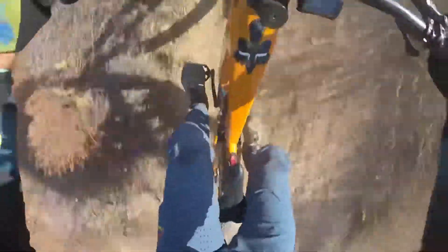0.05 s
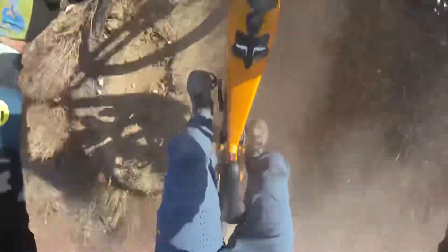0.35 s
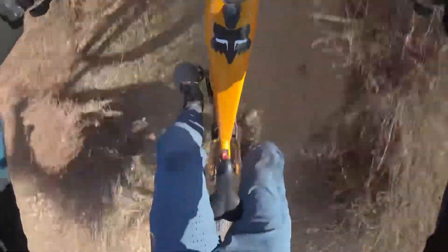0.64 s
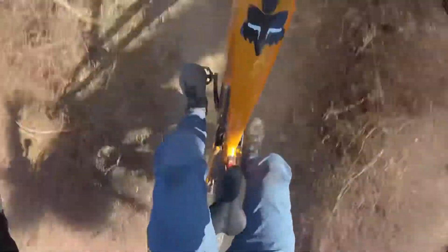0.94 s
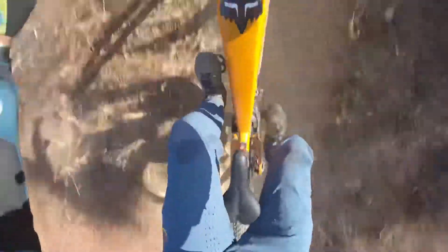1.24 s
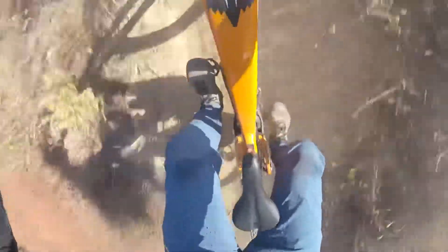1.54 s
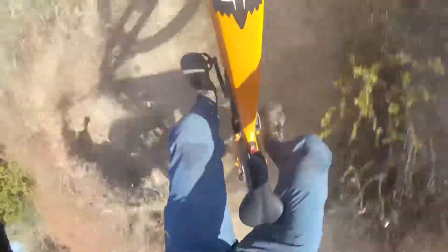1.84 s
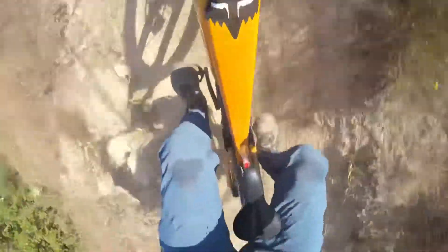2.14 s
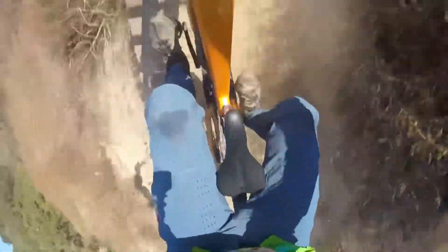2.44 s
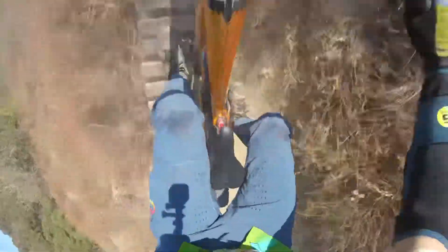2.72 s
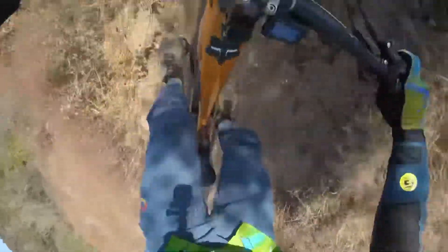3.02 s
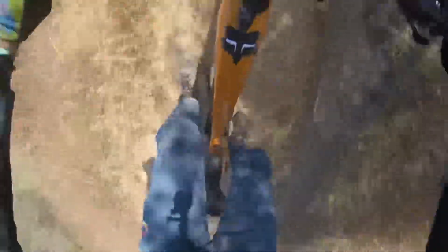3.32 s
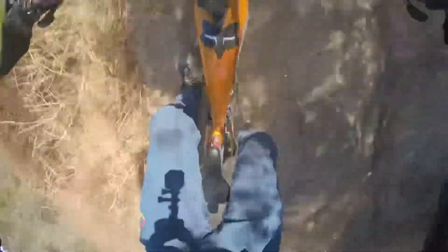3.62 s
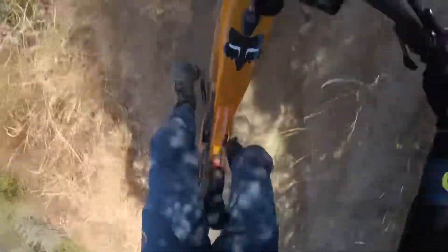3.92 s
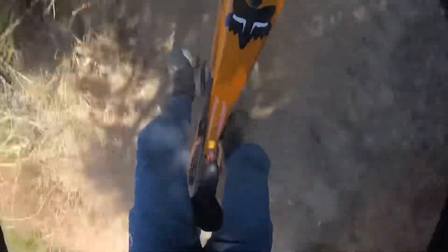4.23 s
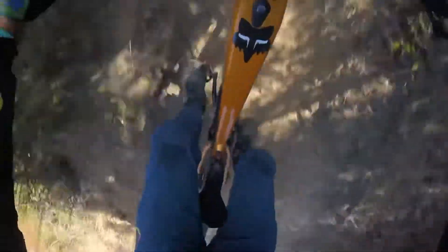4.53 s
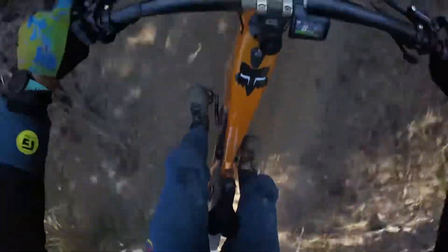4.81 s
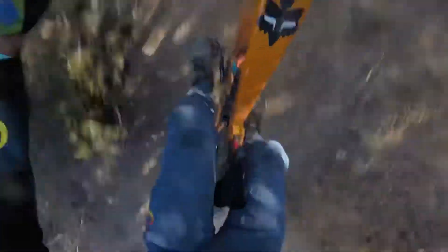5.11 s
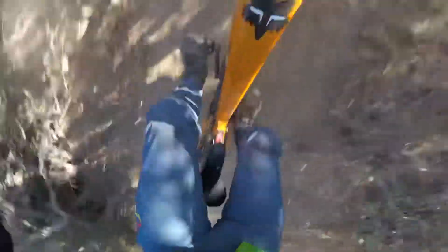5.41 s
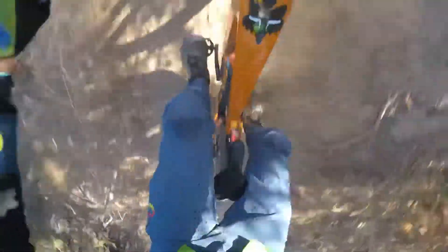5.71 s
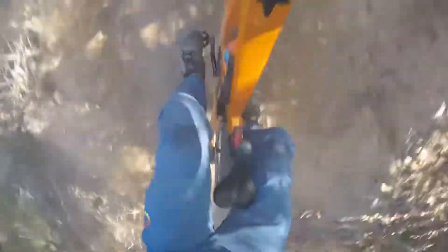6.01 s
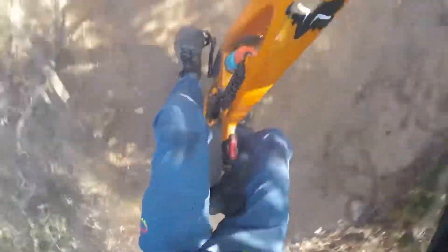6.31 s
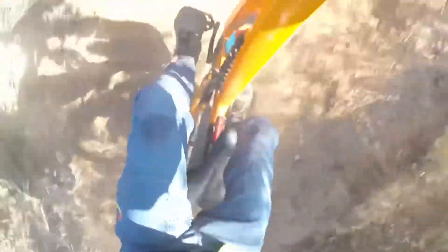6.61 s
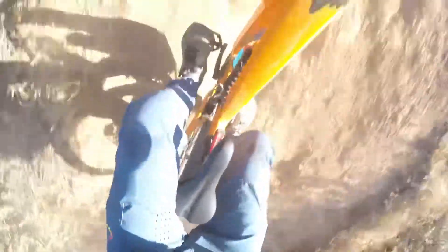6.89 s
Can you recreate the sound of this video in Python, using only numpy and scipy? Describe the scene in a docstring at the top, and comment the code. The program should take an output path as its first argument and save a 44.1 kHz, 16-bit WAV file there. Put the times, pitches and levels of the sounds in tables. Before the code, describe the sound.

A mountain bike's tyres crunch and chain rattles under thumping wind, which eases abruptly after one loud knock on the microphone.

```python
"""Mountain bike on a dry dirt trail

Heard from a camera worn by the rider. Wind buffets the microphone and hisses at its port, jolts thump it.
The tyres crunch over grit, chain and cables rattle on the frame, grass brushes past and twigs snap.
Among the bushes something knocks the camera and the rush drops at once; then the tyres dig into loose dirt.
"""
import sys
import numpy as np
from scipy import signal
from scipy.fft import rfft, irfft
from scipy.io import wavfile
from scipy.ndimage import uniform_filter1d

SR = 44100
rng = np.random.default_rng(int(sys.argv[2]) if len(sys.argv) > 2 else 0)


def dump_mix(stems):
    """Bounce the given channels to the path in sys.argv[1] as a 16-bit WAV at rate SR."""
    frames = np.atleast_2d(stems).T  # one column per channel
    limited = np.clip(frames, -1, 1)  # hard clip at full scale
    pcm = np.round(limited * 32767).astype(np.int16)
    wavfile.write(sys.argv[1], SR, pcm)


N = 315315
TIME = np.arange(N) / SR

# Jolts that thump the microphone. Each row: time in seconds, relative peak in dB, push width in seconds.
JOLTS = [(0.249, 0.5, 0.0058), (0.372, -1.5, 0.0043), (0.522, -5.5, 0.0035), (0.587, -19, 0.0038),
         (0.684, -11.5, 0.0022), (0.785, -14, 0.0061), (0.871, -11, 0.0048), (0.918, -8.5, 0.0024),
         (0.979, -11, 0.0062), (1.031, -10.5, 0.0063), (1.486, -20, 0.007), (1.572, -8.5, 0.0021),
         (1.685, -10, 0.0026), (1.807, -8.5, 0.0041), (1.866, -8.5, 0.0037), (1.929, -3, 0.0058),
         (1.987, -17, 0.008), (2.091, -12, 0.0037), (2.168, -8, 0.0036), (2.362, -11, 0.0022),
         (2.53, -10.5, 0.0027), (2.597, -20, 0.0055), (2.67, -16, 0.0015), (2.774, -18.5, 0.0055),
         (2.906, -17.5, 0.0023), (3.048, -9.5, 0.0046), (3.09, -15, 0.0033), (3.201, -5, 0.0056),
         (3.294, -11.5, 0.0062), (3.373, -6.5, 0.0058), (3.425, -16.5, 0.0028), (3.506, -10, 0.0054),
         (3.639, -21, 0.005), (3.709, -20, 0.0038), (3.892, -21, 0.008), (4.012, -12.5, 0.0045),
         (4.099, -20.5, 0.0064), (4.156, -14, 0.008), (4.341, -6.5, 0.0053), (4.394, -10.5, 0.0026),
         (4.563, -8, 0.0047), (4.707, -9, 0.0038), (4.767, -12.5, 0.0019), (4.93, -14, 0.0036),
         (5.065, -15.5, 0.0045), (5.443, -20, 0.0035), (5.554, -22.5, 0.003), (5.671, -28.5, 0.0061),
         (5.74, -32, 0.008), (5.812, -34, 0.0074), (6.152, -23, 0.0026), (6.25, -26, 0.0077),
         (6.355, -24, 0.007), (6.4, -22.5, 0.0077), (6.593, -15.5, 0.0055), (6.868, -20, 0.008),
         (6.95, -16, 0.0059), (7.134, -13.5, 0.0031)]
# Hollow resonances of the frame. Each row: pitch in Hz, width in Hz, lift in dB.
FRAME_MODES = [(833, 81, 0.5), (1200, 120, 3), (1650, 200, -3), (2160, 210, 1.5)]


def gain_of(db):
    """Decibels to amplitude."""
    return np.exp(np.asarray(db) * float(np.log(10) / 20))


def unit_rms(x):
    """Scales to rms 1."""
    return x / np.sqrt(np.mean(x ** 2) + 1e-20)


def add(mix, start, sound):
    """Mixes a sound in at a time in seconds."""
    part = mix[max(round(start * SR), 0):][:len(sound)]
    part += sound[:len(part)]


def colour(x, spectrum):
    """A causal EQ of unit energy, drawn through points of frequency in Hz and level in dB."""
    size = 8192
    point_hz, db = np.transpose(spectrum)
    hz = abs(np.fft.fftfreq(size, 1 / SR))
    log_gain = np.log(gain_of(np.interp(np.log(hz + 1), np.log(point_hz), db)))
    taps = np.fft.ifft(np.exp(np.conj(signal.hilbert(log_gain)))).real[:size // 2]  # minimum phase
    return signal.oaconvolve(x, taps / np.linalg.norm(taps))[:N]


def lift(x, modes):
    """Adds the ring of a few resonances to a sound."""
    for hz, width, db in modes:
        x = x + (gain_of(db) - 1) * signal.lfilter(*signal.iirpeak(hz, hz / width, fs=SR), x)
    return x


def resonate(x, hz, width_hz):
    """A resonance of gain 1 that follows a pitch curve."""
    turn = np.exp(2j * np.pi * np.cumsum(hz) / SR)
    pole = np.exp(-np.pi * width_hz / SR)
    return 2 * (turn * signal.lfilter([1 - pole], [1, -pole], x / turn)).real


def low_cut(x, hz, q):
    """A resonant high-pass: a push of pressure swings back and rings."""
    w = 2 * np.pi * hz
    return signal.lfilter(*signal.bilinear([1, 0, 0], [1, w / q, w * w], SR), x)


def wander(rate_hz):
    """A random drift of rms 1 that rolls off above the given rate."""
    hz = np.fft.rfftfreq(4096, TIME[-1] / 4096)
    drift = irfft(rfft(rng.standard_normal(4096)) * hz / (hz + 2) * np.exp(-(hz / rate_hz) ** 2))
    return np.interp(TIME, np.linspace(0, TIME[-1], len(drift)), unit_rms(drift))


def patchy(x, depth_db):
    """Lets narrow bands swell and fade on their own for some tens of ms."""
    bands = signal.stft(x.astype(np.float32), nperseg=512)[2]
    swell = uniform_filter1d(rng.random(bands.shape, np.float32) - .5, size=5, axis=0)
    swell = unit_rms(uniform_filter1d(swell, size=6, axis=1))
    return unit_rms(signal.istft(bands * gain_of(depth_db * swell), nperseg=512)[1][:N])


def arches(rows, power):
    """A gain that swells and fades once for each row; a low power flattens the top."""
    out = np.zeros(N)
    for start, length, db in rows:
        add(out, start, gain_of(db) * abs(np.sin(np.linspace(0, np.pi, round(length * SR)))) ** power)
    return out


def grit(per_s, spread_db):
    """Tiny impacts at random times: many small, a few large."""
    when, chance, sign = rng.random((40000, 3))[:round(per_s * TIME[-1])].T
    size = gain_of(spread_db * np.minimum(-np.log(1 - chance), 4))
    return unit_rms(np.bincount((when * N).astype(int), size * np.sign(sign - .5), N))


def burst(length, per_s, tail):
    """A fizzy cluster of impacts that starts abruptly, holds and dies; tail is a share of the length."""
    t = np.arange(round(3 * length * SR)) / SR
    envelope = np.minimum(t / (0.026 * length), 1) * np.exp(-np.maximum(t / length - .7, 0) / tail)
    fizz = rng.standard_normal(SR // 2)[:len(t)]
    struck = rng.random(SR // 2)[:len(t)] < per_s / SR
    hits = (.5 * fizz + np.sign(fizz) * struck * np.sqrt(SR / per_s)) * envelope
    return hits * np.sqrt(length * SR) / np.linalg.norm(hits)


def ride_gains():
    """Faders for air hiss and rolling tyres, which step down together among the bushes."""
    # Before and after the drop. Each row: time in seconds, relative hiss and grit levels in dB.
    open_trail = [(0.0, -43, -40), (0.37, -45, -42.5), (0.77, -42, -40), (1.8, -42.5, -41),
                  (2.28, -38.5, -42), (2.62, -41.5, -42), (2.79, -48, -49.5), (2.93, -48, -45.5),
                  (3.02, -45, -42.5), (3.2, -44, -41), (4.1, -44.5, -43.5), (4.29, -43, -40.5),
                  (4.9, -43, -44), (4.97, -41, -44)]
    bushes = [(5.1, -50.5, -49), (5.46, -53, -50.5), (5.85, -51.5, -47.5), (6.3, -48.5, -50.5),
              (6.6, -48, -45), (6.72, -47, -38), (7.15, -50.5, -40)]
    drop_s = 5.056
    before, after = np.transpose(open_trail), np.transpose(bushes)
    return [gain_of(np.where(TIME < drop_s, np.interp(TIME, before[0], a), np.interp(TIME, after[0], b)))
            for a, b in zip(before[1:], after[1:])]


def air_rush(hiss):
    """Smooth hiss of moving air, wavering a little."""
    # A broad, bright hiss. Each row: frequency in Hz, level in dB.
    air_eq = [(200, -2.5), (700, -5.5), (1600, 0), (2600, -5), (3300, -3.5), (4200, -10), (5200, -2.5),
              (6100, -2), (7200, -3.5), (8500, -8), (10300, -14.5), (11400, -23), (12500, -75)]
    air = patchy(colour(rng.standard_normal(N), air_eq), depth_db=2.5)
    return gain_of(-3.5) * hiss * air * gain_of(0.56 * wander(rate_hz=100))


def gusts():
    """Strength of the buffeting: the air slackens just before each jolt and a wake of eddies follows."""
    # Wind buffeting, strongest at the start, with brief lulls, much weaker after the loud knock.
    # Each row: time in seconds, level in dB.
    airflow = [(0, -21.5), (0.5, -21), (0.7, -25), (1.3, -27), (1.62, -23.5), (1.75, -33), (1.82, -23.5),
               (2.15, -25), (2.26, -34), (2.7, -30.5), (2.95, -32), (3.04, -28.5), (3.45, -31.5),
               (3.72, -31.5), (3.78, -39.5), (3.97, -36.5), (4.06, -28), (4.24, -31), (4.3, -32.5),
               (4.37, -31), (5.1, -30.5), (5.19, -46.5), (5.35, -40.5), (6.05, -42.5), (6.4, -40.5),
               (6.75, -46.5), (6.9, -36.5), (7.15, -36.5)]
    lull_db, lull_lead_s, lull_s = -1, 0.016, 0.024
    wake_db, wake_rise_s, wake_decay_s = -19.5, 0.007, 0.06
    lull, wake = np.zeros(N), np.zeros(N)
    t = np.arange(SR // 3) / SR
    wake_shape = np.minimum(t / wake_rise_s, 1) * np.exp(-t / wake_decay_s)
    for start, db, _ in JOLTS:
        add(lull, start - lull_lead_s - lull_s / 2, np.hanning(round(lull_s * SR)))
        add(wake, start, gain_of(db + wake_db) * wake_shape)
    flow_db = np.interp(TIME, *np.transpose(airflow))
    return np.hypot(gain_of(flow_db + lull_db * lull), wake)


def buffeting(hiss, skid):
    """Lumpy eddies press on the microphone; the strong ones carry a short flutter, which skids stir up."""
    # Rumble of large eddies, flutter of small ones. Each row: frequency in Hz, level in dB.
    eddy_eq = [(12, -22), (25, 3.5), (45, -3.5), (71, 1), (100, -6.5), (150, -9.5), (220, -16), (290, -31),
               (450, -38), (1500, -86)]
    flutter_eq = [(80, -20.5), (160, -5), (220, 0), (290, -8.5), (400, -17), (600, -20.5), (1200, -38),
                  (4000, -79)]
    eddies = colour(rng.standard_normal(N), eddy_eq)
    eddies /= np.sqrt(uniform_filter1d(eddies ** 2, size=3000))  # steady overall, lumpy up close
    flutter = unit_rms(colour(rng.standard_normal(N), flutter_eq) * (2.2 + abs(eddies)))
    eddy_gain = gusts() * gain_of(2.06 * wander(rate_hz=18))
    flutter_gain = eddy_gain ** 0.8 * hiss ** 0.51 * gain_of(4 + 1.56 * wander(rate_hz=40))
    return eddy_gain * eddies + np.hypot(flutter_gain, gain_of(-1.5) * skid) * flutter


def thumps():
    """Each jolt is a single push of pressure that rings in the microphone's low cut."""
    out, t = np.zeros(N), np.arange(-SR // 100, SR // 8) / SR
    for start, db, width in JOLTS:
        push = -np.exp(-((t - .0052) / (width / 2)) ** 2)
        ring = low_cut(low_cut(push, hz=62, q=1.53), hz=38, q=0.58)
        add(out, start + t[0], gain_of(db - 6) * ring / abs(ring).max())
    return out


def camera_knocks():
    """Sharp blows on the case: pressure swells, drops at once and swings back, with a faint tick."""
    # Each row: time in seconds, peak in dB.
    knocks = [(0.2514, -12.5), (5.1161, -2), (7.14, -22)]
    tick_eq = [(3000, -40), (5500, -15), (6600, -2), (9000, -20), (12000, -36)]
    out, t = np.zeros(N), np.arange(-SR // 100, SR // 10) / SR
    dip = np.exp(-(t / 0.001) ** 2) * (1 + np.tanh(t / 0.00016)) / 2
    swell = 0.35 * np.exp(-(t / 0.0016) ** 2) + 0.12 * np.exp(-((t - .0035) / 0.001) ** 2)
    blow = low_cut(swell - dip, hz=93, q=1.8)
    tick = colour((t == 0).astype(float), tick_eq)[:len(t)]
    for start, db in knocks:
        add(out, start + t[0], gain_of(db) * (blow / abs(blow).max() + gain_of(-21) * tick))
    return out


def grass():
    """Dry stalks slide past in a fine, bright fizz, each with its own thin zip."""
    # Each row: start and length in seconds, level in dB, zip pitch in Hz, zip lift in dB.
    swishes = [(0.826, 0.016, -45, 6900, 14), (1.311, 0.044, -40, 10600, 14), (1.528, 0.025, -52, 8100, 13),
               (2.368, 0.01, -42, 7800, 5), (2.693, 0.034, -47.5, 6940, 7), (3.161, 0.014, -51, 7500, 14),
               (5.006, 0.031, -48, 7200, 3)]
    grass_eq = [(2000, -15), (4500, -6), (6400, -1.5), (7500, -1), (10000, -11.5), (11800, -29),
                (13000, -42)]
    zip_width_hz = 290
    out = np.zeros(N)
    for start, length, db, zip_hz, zip_db in swishes:
        fizz = burst(length, per_s=5400, tail=0.59)
        add(out, start, gain_of(db) * lift(fizz, [(zip_hz, zip_width_hz, zip_db)]))
    return colour(out, grass_eq)


def twigs():
    """Dry wood cracks close by in a brief, bright cluster: the thinner the twig, the higher."""
    # Each row: start and length in seconds, level in dB, low cut in Hz.
    snaps = [(2.283, 0.0083, -30.5, 1110), (3.18, 0.005, -28, 700), (3.253, 0.0043, -35, 1200),
             (5.044, 0.0094, -31, 220), (5.23, 0.0028, -28, 350), (5.2333, 0.0008, -19, 350),
             (5.237, 0.0045, -38, 400)]
    # The tone of dry wood. Each row: frequency in Hz, level in dB.
    wood_eq = [(120, -10), (300, 13.5), (1100, 3), (2400, 1.5), (3800, -9), (5500, -2), (6500, -2.5),
               (7500, 0.5), (9500, -6), (11500, -23), (13500, -42)]
    out = np.zeros(N)
    for start, length, db, cut_hz in snaps:
        add(out, start, gain_of(db) * low_cut(burst(length, per_s=6100, tail=0.25), cut_hz, q=0.88))
    return colour(out, wood_eq)


def clatter(hiss, roll):
    """Chain and cables sound the frame and ring the steel in short rattles; flung grit ticks between."""
    # Each row: start in seconds, relative frame and metal levels in dB.
    rattles = [(0.079, -34, -38), (0.297, -46, -42), (0.342, -32, -45), (0.481, -35, -44),
               (0.664, -32, -36), (0.828, -30, -41), (0.961, -34, -39), (1.027, -36, -33),
               (1.187, -35.5, -35.5), (1.403, -32.5, -31.5), (1.451, -29, -43), (1.553, -32, -55),
               (2.029, -35, -43), (2.287, -38, -25.5), (2.475, -38, -36), (2.581, -57, -38),
               (2.658, -53, -37), (2.712, -35.5, -43), (2.736, -37, -49), (2.789, -46, -48),
               (2.843, -32.5, -33), (2.977, -41, -33.5), (2.993, -35.5, -41), (3.056, -34, -39.5),
               (3.105, -42, -41), (3.125, -51, -32), (3.216, -37, -38), (3.331, -47, -41),
               (3.466, -29.5, -37), (3.824, -30, -41), (3.856, -46, -37), (4.148, -40, -35),
               (4.295, -38, -30), (4.31, -35, -41.5), (4.94, -47, -45), (5.01, -31, -38),
               (5.047, -34.5, -53), (5.231, -40, -35), (5.386, -44, -50), (5.751, -43, -50),
               (5.798, -42, -53), (5.842, -43, -57), (5.882, -40, -52), (5.906, -46, -50), (5.96, -52, -51),
               (6.043, -43, -56), (6.079, -53, -59), (6.129, -44, -45), (6.178, -43, -52),
               (6.219, -42, -51), (6.388, -47, -48), (6.409, -38.5, -51), (6.442, -39.5, -48),
               (6.462, -42, -47), (6.485, -31.5, -55), (6.578, -45, -55), (6.659, -33.5, -47),
               (6.672, -44, -35.5), (6.68, -43, -36), (6.88, -34.5, -48), (7.001, -31.5, -43)]
    # Hollow frame, bright metal. Each row: frequency in Hz, level in dB.
    frame_eq = [(150, -23), (500, 7), (900, 4), (1300, 0.5), (1650, 7.5), (2150, 4.5), (2700, 1),
                (3500, -5.5), (5000, -27), (9000, -32)]
    metal_eq = [(1500, -23), (2700, 3.5), (3400, -2), (4200, -4.5), (5100, 0.5), (5540, -2), (5950, -9.5),
                (6500, -3), (7500, -8.5), (9500, -15), (12500, -41)]
    rattle_s, steel_hz, steel_width_hz, steel_db = 0.0079, 5620, 300, 7.5
    frame, metal = np.zeros(N), np.zeros(N)
    for start, frame_db, metal_db in rattles:
        longer, higher = rng.uniform(-1.65, 1, 2)
        length = rattle_s * (1 + 0.27 * longer)
        link = [(steel_hz * (1 + 0.032 * higher), steel_width_hz, steel_db)]  # a new link each time
        add(frame, start, gain_of(frame_db) * burst(length, per_s=2000, tail=0.45))
        add(metal, start, gain_of(metal_db - 5.5) * lift(burst(length, per_s=2000, tail=0.35), link))
    flung = grit(per_s=45, spread_db=2.5)
    ticks = unit_rms(signal.oaconvolve(flung, burst(.002, per_s=2500, tail=.5))[:N])
    frame += gain_of(-12) * roll * ticks
    metal += gain_of(-17) * hiss * ticks
    return gain_of(-2) * lift(colour(frame, frame_eq), FRAME_MODES) + colour(metal, metal_eq)


def frame_clacks():
    """A hard hit sets the hollow frame ringing, at a pitch that depends on where it lands."""
    # Each row: start in seconds, level in dB, lowest mode in Hz.
    hits = [(0.43, -26, 1210), (0.44, -23, 810), (0.665, -31, 930), (1.029, -32, 1180), (2.2875, -25, 945),
            (2.634, -32, 930), (2.668, -28, 980), (3.127, -34, 1270), (3.826, -31, 770), (5.046, -29, 880),
            (7.008, -32, 860), (7.137, -29, 900)]
    # Each row: multiple of the lowest mode, level in dB, seconds to fade by 60 dB.
    modes = [(1, -1.5, .05), (1.43, 0, .05), (1.8, -4, .035), (2.42, -6, .03)]
    out, t = np.zeros(N), np.arange(SR // 10) / SR
    for start, db, hz in hits:
        for multiple, mode_db, t60 in modes:
            ring = np.sin(2 * np.pi * hz * multiple * t) * np.exp(-np.log(1000) * t / t60)
            add(out, start, gain_of(db + mode_db) * ring)
    return out


def knob_hum():
    """The tyre's knobs drum on hard-packed ground at an uneven rate: a fuzzy low drone."""
    # Each row: start and length in seconds, relative level in dB, knob rate in Hz.
    stretches = [(0, 0.5, -43, 219.6), (0.602, 0.47, -38.5, 315.2), (0.847, 0.26, -42, 218),
                 (1.4, 0.44, -43.5, 294), (2.153, 0.37, -37, 295), (2.445, 0.48, -38.5, 214.1),
                 (6.678, 0.31, -42, 289)]
    blur = wander(rate_hz=39) + 1j * wander(rate_hz=75)
    drone = sum(arches([swell], power=0.99) * np.exp(2j * np.pi * hz * TIME) for *swell, hz in stretches)
    return gain_of(-2) * (drone * blur).real


def tyre_bites():
    """A tyre digs into loose dirt: a gritty crunch over a low scrape of its casing."""
    # Each row: start and length in seconds, crunch level in dB, scrape level in dB.
    bites = [(0.176, 0.039, -36, -37.5), (0.345, 0.039, -38.5, -38), (0.396, 0.022, -37, -42),
             (0.423, 0.039, -26.5, -48), (0.834, 0.052, -39.5, -55), (0.917, 0.022, -35.5, -35),
             (1.552, 0.034, -29.5, -35.5), (1.763, 0.024, -32, -37), (1.861, 0.035, -34, -31),
             (1.902, 0.033, -50, -32.5), (1.993, 0.018, -39, -40), (2.487, 0.024, -49, -32),
             (2.624, 0.016, -47, -37), (2.659, 0.016, -54, -33), (2.845, 0.013, -49, -35),
             (3.459, 0.037, -37, -39.5), (3.796, 0.034, -36, -60), (4.129, 0.034, -35, -50),
             (4.281, 0.021, -37.5, -40), (4.759, 0.033, -40.5, -39), (4.995, 0.033, -38.5, -40),
             (5.842, 0.022, -46.5, -43), (5.881, 0.04, -44, -40.5), (6.079, 0.034, -41, -52),
             (6.519, 0.045, -39.5, -41.5), (6.715, 0.046, -36.5, -39.5), (6.864, 0.16, -51, -38.5),
             (6.991, 0.036, -35, -48), (7.089, 0.042, -34.5, -37)]
    # Crunchy dirt, dull casing. Each row: frequency in Hz, level in dB.
    crunch_eq = [(100, -13), (300, -1.5), (500, -5.5), (780, 6), (1000, -2), (1600, -1.5), (2500, -5),
                 (3300, -13.5), (4300, -20.5), (5600, -17), (8000, -29), (12000, -73)]
    casing_eq = [(100, -9), (300, -1.5), (480, -2), (640, -4.5), (900, -13), (2000, -33), (6000, -82)]
    crunch, scrape = np.zeros(N), np.zeros(N)
    for start, length, crunch_db, scrape_db in bites:
        add(crunch, start, gain_of(crunch_db) * burst(length, per_s=900, tail=0.35))
        add(scrape, start, gain_of(scrape_db) * burst(length, per_s=730, tail=0.32))
    return lift(colour(crunch, crunch_eq), FRAME_MODES) + colour(scrape, casing_eq)


def tyres(roll, skid):
    """Knobs crush grit and stones as the ground shakes the wheels; in turns the tread scrubs."""
    # Fine grit, scrubbing tread, coarse crackling stones. Each row: frequency in Hz, level in dB.
    dirt_eq = [(120, -15.5), (400, -4.5), (700, -3.5), (980, -3.5), (1300, 1), (1650, 4), (2000, -4),
               (2500, -2), (3200, -14), (4200, -21), (6000, -23), (8000, -21), (12000, -66)]
    tread_eq = [(120, -29), (320, 6.5), (430, 4.5), (520, 2), (650, 6), (780, 7), (880, -2), (1050, -4.5),
                (1300, -4.5), (2000, -13), (4000, -48)]
    stone_eq = [(200, -17), (600, -1), (1020, 2.5), (1400, -2), (2000, 0.5), (3000, -8.5), (4500, -19),
                (8000, -30), (12000, -59)]
    shake = gain_of(wander(rate_hz=70))
    grains = patchy(colour(grit(per_s=4500, spread_db=1.5), dirt_eq), depth_db=2.2)
    tread = patchy(colour(grit(per_s=2700, spread_db=2.0), tread_eq), depth_db=2.0)
    stones = colour(grit(per_s=170, spread_db=2.2), stone_eq)
    crush = np.hypot(gain_of(-1.93) * roll, gain_of(-10) * skid)
    scrub = np.hypot(gain_of(-6) * roll, gain_of(-1.5) * skid)
    return shake * (crush * grains + scrub * tread) + gain_of(-7) * crush * stones


def scene():
    """Everything reaches the one microphone from close by, in the open air."""
    # Tyres scrub sideways through the turns. Each row: start and length in seconds, relative level in dB.
    skids = [(0, 0.14, -39.5), (.17, 0.37, -34.5), (.72, 0.24, -45), (1.06, 0.1, -36.5), (1.85, 0.16, -41),
             (2.48, 0.41, -44), (3.02, 0.075, -40.5), (3.77, 0.11, -37.5), (4.72, 0.12, -42.5),
             (5.87, 0.12, -42), (6.43, 0.15, -45), (6.66, 0.32, -41)]
    hiss, roll = ride_gains()
    skid = arches(skids, power=0.26)
    wind = buffeting(hiss, skid) + thumps() + air_rush(hiss)
    bike = tyres(roll, skid) + tyre_bites() + knob_hum() + clatter(hiss, roll) + frame_clacks()
    return (wind + bike + twigs() + grass() + camera_knocks())[None]


def record(dry):
    """The microphone port adds a broad ring and a narrow, wavering whistle; the top treble is cut."""
    # The port's broad resonance. Each row: pitch in Hz, width in Hz, lift in dB.
    port_modes = [(5650, 700, 8)]
    whistle_hz, whistle_db, waver, cutoff_hz = 6465, 11, 0.007, 12600
    heard = lift(dry, port_modes)
    pitch = whistle_hz * (1 + waver * wander(rate_hz=18))
    heard = heard + (gain_of(whistle_db) - 1) * resonate(heard, pitch, width_hz=140)
    low_pass = signal.firwin(255, cutoff_hz, window=("kaiser", 9), fs=SR)
    return signal.oaconvolve(heard, low_pass[None], "same")


dry = scene()
out = record(dry)
dump_mix(out)
```